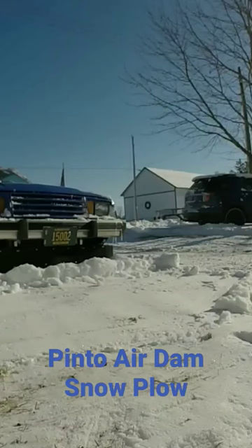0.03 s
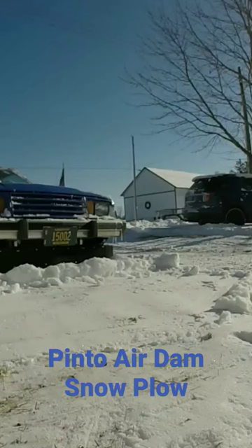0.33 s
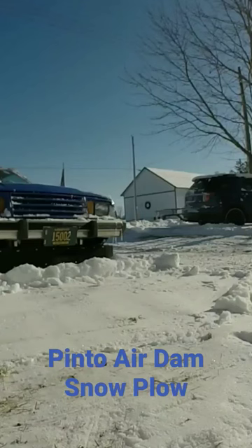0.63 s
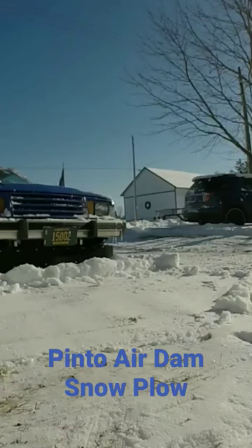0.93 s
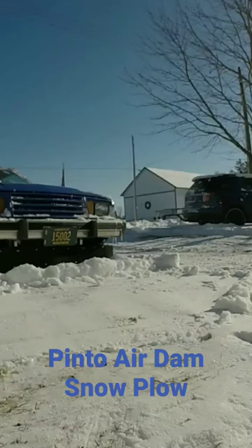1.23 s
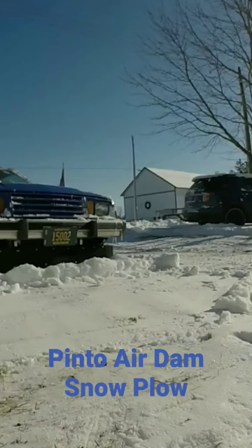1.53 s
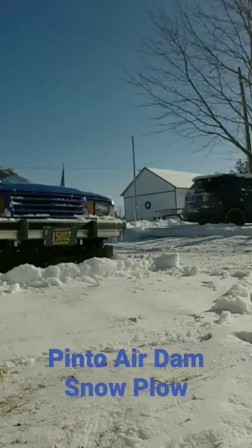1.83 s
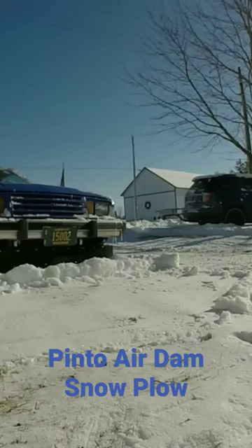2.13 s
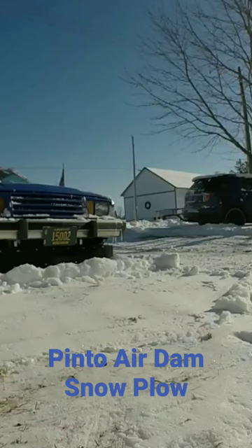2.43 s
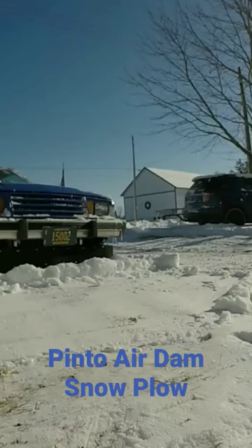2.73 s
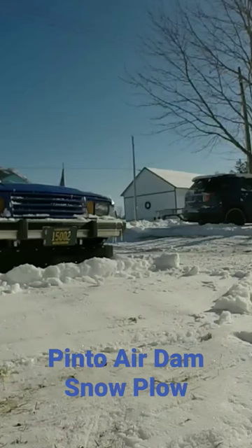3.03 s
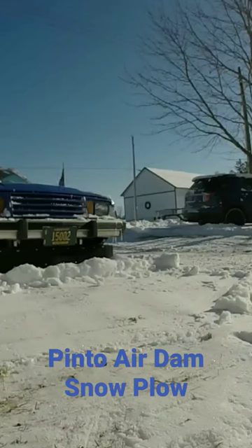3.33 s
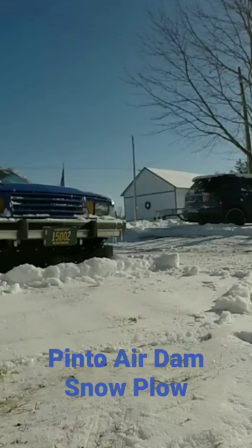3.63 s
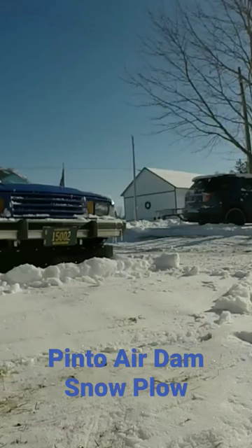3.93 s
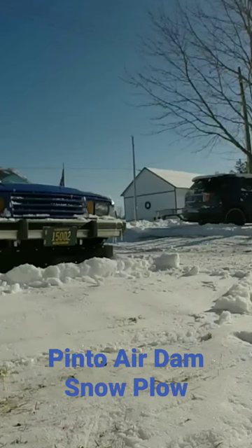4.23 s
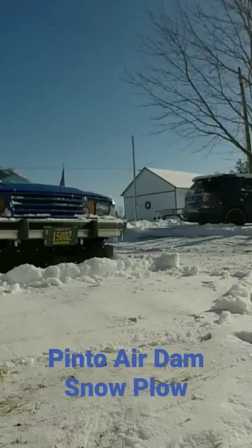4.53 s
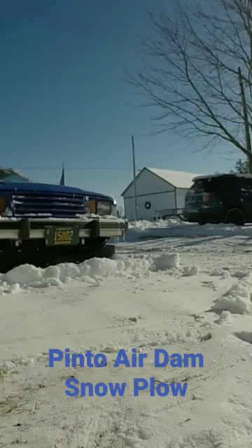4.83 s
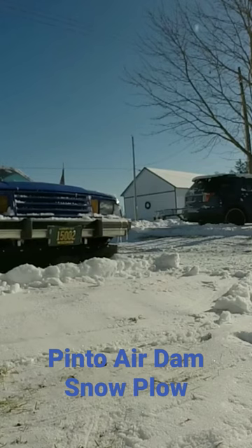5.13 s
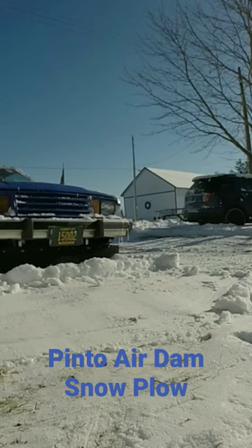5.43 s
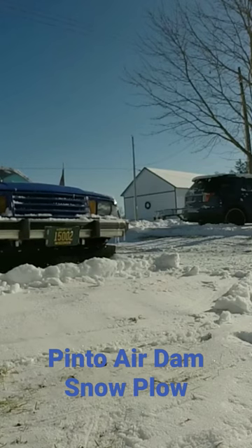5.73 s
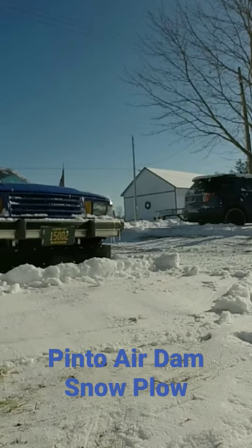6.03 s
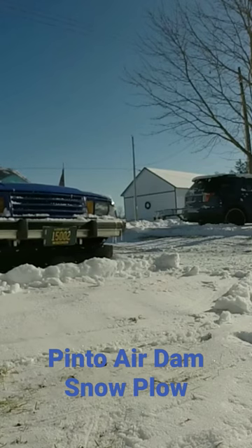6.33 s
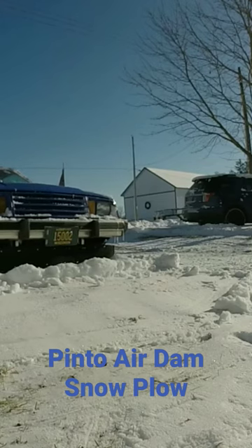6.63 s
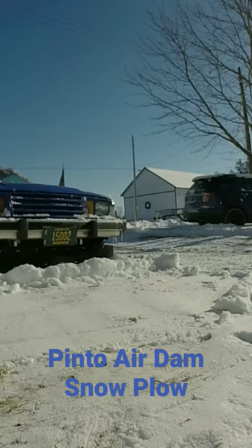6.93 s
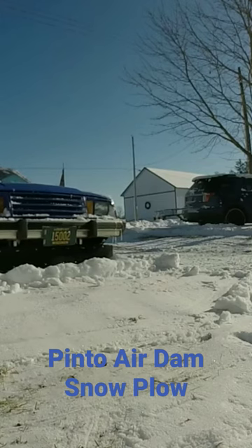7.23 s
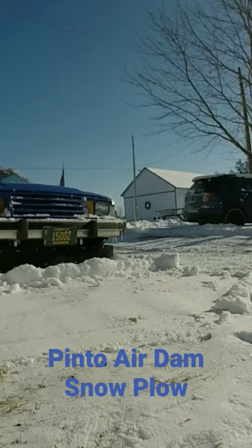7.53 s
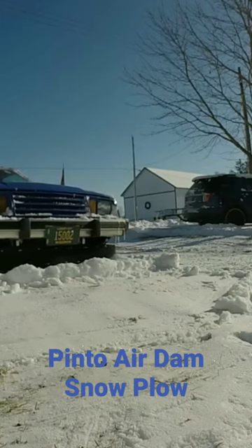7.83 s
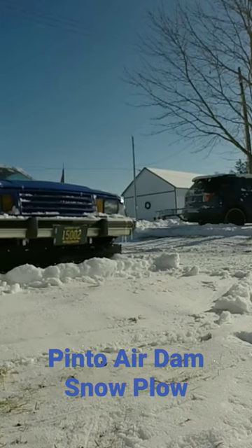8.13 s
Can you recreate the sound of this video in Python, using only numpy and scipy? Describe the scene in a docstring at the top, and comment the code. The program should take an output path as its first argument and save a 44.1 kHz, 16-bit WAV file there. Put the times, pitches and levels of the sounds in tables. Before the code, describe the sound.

After a split second of silence, the sound cuts in on a vehicle engine idling outdoors, heard almost entirely in the right channel. The exhaust gives a low drone with uneven thuds and rumble. Above it, more quietly, a fan rushes and hisses, valves tick lightly and an alternator adds a thin, fuzzy whine. The idle eases slightly in the first second, then holds steady. At about 4.2 seconds the engine is revved: the pitch climbs, the tailpipe booms, and the rush and whine grow louder, peaking between 4.6 and 5 seconds. It winds down and is back at idle by 6 seconds. At 7.5 seconds it revs again, quickly reaching a higher pitch, and stays there, loud, until the sound ends just after 8 seconds.

```python
"""After a brief silence the sound cuts in, almost wholly in the right channel: an engine idles in a snowy
yard. The exhaust drones on the firing rate and thuds unevenly, the fan rushes, the valves tick and a
belt-driven alternator whines in step with the shaft. Just after 4 s the engine is revved: its tones
rise, the tailpipe booms and the flow grows louder. It is back at idle by 6 s, and from 7.5 s it is
revved again, higher, until the sound ends."""
import sys
import numpy as np
from scipy.fft import rfft, irfft, next_fast_len
from scipy.io import wavfile
from scipy.ndimage import uniform_filter1d, map_coordinates

SR = 44100
rng = np.random.default_rng(int(sys.argv[2]) if len(sys.argv) > 2 else 0)


def bounce(signal):
    """Save signal as a 16-bit WAV file at the path given by the first command-line argument."""
    frames = np.transpose(np.atleast_2d(signal))
    limited = np.clip(frames, -1, 1)
    pcm = np.round(limited * 32767).astype(np.int16)
    wavfile.write(sys.argv[1], SR, pcm)


N = 360738

IDLE_HZ = 45  # firings per second at idle
BELT_LAPS = .215  # laps of the belt per firing


def amp(db):
    """Amplitude ratio for a level in decibels."""
    return 10 ** (np.asarray(db) / 20)


def unit(x):
    """The signal scaled to an rms of 1."""
    return x / np.sqrt(np.mean(x ** 2) + 1e-20)


def along(points, hz):
    """Rows of frequency and value, interpolated on a logarithmic frequency axis."""
    frequencies, values = np.transpose(points)
    return np.interp(np.log(hz + 1), np.log(frequencies + 1), values)


def curves(rows):
    """Linear interpolation in time: one value per sample for each column after the first."""
    seconds, *columns = np.transpose(rows)
    return [np.interp(np.arange(N) / SR, seconds, column) for column in columns]


def wobble(rate):
    """A smooth random fluctuation through `rate` Gaussian values a second."""
    knots = rng.standard_normal(int(N * rate / SR) + 4)
    return map_coordinates(knots, [np.arange(N) * rate / SR])


def filtered(x, response):
    """Linear filtering: the spectrum of x is multiplied by a frequency response."""
    size = next_fast_len(N + SR // 2)
    return irfft(rfft(x, size) * response(np.fft.rfftfreq(size, 1 / SR)), size)[:N]


def noise(spectrum):
    """White noise filtered to the given spectrum, with an rms of 1."""
    return unit(filtered(rng.standard_normal(N), lambda hz: amp(along(spectrum, hz))))


def bursts(cycles, life, scatter_db):
    """Exponential decay from a random height once a cycle; `life` is the time constant in cycles."""
    index = np.floor(cycles - np.floor(cycles[0])).astype(int)
    heights = amp(scatter_db * rng.uniform(-1.3, 1, SR // 10))
    return unit(heights[index] * np.exp(-(cycles % 1) / life))


def shaft():
    """Phase is the integral of frequency: the firing rate sums to a count that times every part."""
    # Each row: time in seconds, firing rate in Hz.
    firing_rate = [(0.13, 49.73), (0.94, 46.24), (2.72, 45.41), (4.22, 44.97), (4.45, 60.94), (4.68, 67.31),
                   (5.0, 65.78), (5.42, 57.2), (5.5, 51.26), (5.8, 46.53), (6.79, 44.86), (7.53, 45.56),
                   (7.85, 71.69), (7.93, 74.94), (8.18, 73.94)]
    full_pull = 0.57  # octaves per second at which the pull begins to saturate
    speed, = curves(firing_rate)
    firings = np.cumsum(speed) / SR
    revs = np.maximum(np.log2(speed / IDLE_HZ), 0)  # octaves above idle
    climb = uniform_filter1d(np.gradient(revs) * SR, size=SR // 6)
    pull = np.tanh(climb / full_pull)  # towards 1 speeding up, towards -1 coasting
    return speed, firings, revs, pull


def drone(speed, firings, revs, pull, hum_db):
    """Resonance: the firing note booms in the tailpipe; higher orders glide through the muffler's peaks."""
    # Tailpipe response. Each row: firing rate in Hz, level in dB.
    tailpipe = [(45, -23.5), (49, -21.5), (53, -20.5), (57.5, -15), (61, -14), (67, -13.5), (75, -16)]
    # Exhaust partials ahead of the muffler. Each row: multiple of the firing rate, relative level in dB.
    orders = [(2, 4), (3, 10), (3.5, -52), (4, 9), (4.25, -59), (4.5, -4), (4.75, -7), (5, -2), (6, -0.5),
              (6.25, -20), (6.5, 0), (6.75, -37), (7, 0), (7.5, -19), (7.75, 9), (8.25, 8), (8.5, -4),
              (9.5, 2.5), (10.75, -1.5), (13, -7.5)]
    # Muffler response. Each row: frequency in Hz, gain in dB.
    muffler = [(65, 12), (92, 2), (125, -11), (140, -15), (165, 2.5), (179, 2.5), (185, -2.5), (190, -1),
               (200, 2.5), (225, 0.5), (255, -36), (275, -0.5), (298, -6), (360, -54), (450, -17.5),
               (600, -31.5), (900, -60)]
    order_lag = .135  # cycles by which the second order trails the firing note at idle
    unsteady = (IDLE_HZ / speed) ** 2  # combustion evens out as the revs rise
    cycles = firings + .005 * unsteady * wobble(14)
    throttle_db = revs * pull  # the boom gains under throttle and loses while coasting
    boom_db = along(tailpipe, speed) + throttle_db + 0.68 * unsteady * wobble(26)
    hum = np.zeros(N)
    for order, db in orders:
        gain = amp(db + along(muffler, order * speed) + 0.67 * wobble(12))
        if order % 1:  # orders between the firings come from unequal cylinders
            gain = gain * unsteady ** .7
        lag = order_lag * ((order - 1) * unsteady) ** 2  # pulses smear at idle and sharpen with the revs
        if order > 6:  # the highest orders waver
            lag = lag + .13 * wobble(30)
        hum += gain * np.cos(2 * np.pi * (order * cycles - lag))
    return amp(boom_db) * np.cos(2 * np.pi * cycles) + amp(hum_db) * hum


def thuds(firings, revs, effort):
    """Pulsating flow: each firing puffs gas down the pipe, uneven combustion rumbles, fast flow roars."""
    # Spectra of puffs, rumble and pipe roar. Each row: frequency in Hz, relative spectral density in dB.
    puff_spectrum = [(20, -26), (40, -12), (62, -11.5), (90, -13.5), (140, -1.5), (210, 0), (300, -9),
                     (360, -6), (430, -15.5), (540, -23), (680, -55), (1500, -74)]
    rumble_spectrum = [(15, -16), (25, -23), (40, -11), (55, 8.5), (72, 1), (85, 1.5), (110, -4),
                       (200, -68)]
    roar_spectrum = [(200, -36), (280, -8), (325, 5.5), (380, -1), (450, -19), (610, 0), (700, -12.5),
                     (1000, -57)]
    puffs = 1 + 0.16 * np.cos(2 * np.pi * (firings - .25)) + 0.12 * np.cos(np.pi * (firings - .2))
    thud = amp(-37 + 0.39 * effort) * unit(noise(puff_spectrum) * puffs)
    rumble = amp(-36.5 + 0.49 * effort) * noise(rumble_spectrum)
    roar = amp(-37.5) * revs * noise(roar_spectrum)
    return thud + rumble + roar


def fan(firings, revs, pull, effort):
    """Flow noise: air rushes through fan and grille and hisses, amplitude-modulated by shaft and belt."""
    # Spectra of rush and hiss. Each row: frequency in Hz, relative spectral density in dB.
    rush_spectrum = [(150, -22), (400, -1), (600, -1.5), (660, -12.5), (710, -8.5), (790, 1.5), (990, -0.5),
                     (1150, 2), (1500, 1), (2050, -6), (2650, -5.5), (3000, -10), (5000, -23.5),
                     (10000, -62)]
    hiss_spectrum = [(1200, -36), (2600, -6), (3600, 5), (4500, 0), (5500, 1.5), (6100, -5), (7000, -8.5),
                     (8500, -10), (10000, -14), (13000, -17), (13800, -27), (15000, -44)]
    laps = BELT_LAPS * firings
    flutter = amp((-0.1 + 0.96 * revs) * np.cos(2 * np.pi * firings) + 0.64 * wobble(70))
    rush = amp(-44 + 1.27 * effort + 0.54 * wobble(120) + 0.34 * wobble(18)) * noise(rush_spectrum)
    intake_db = 0.9 * np.maximum(pull, 0)  # the intake hisses more while the throttle is open
    belt_db = 0.45 * np.cos(4 * np.pi * laps)  # two swells a lap
    hiss = amp(-52.4 + 1.01 * effort + intake_db + 0.18 * wobble(22) + belt_db) * noise(hiss_spectrum)
    return flutter * (rush + hiss)


def valves(firings, effort):
    """Damped impacts: valves close twice a firing, and one loose tappet ticks once in four firings."""
    # Spectrum of a tick. Each row: frequency in Hz, relative spectral density in dB.
    tick_spectrum = [(500, -23), (1200, 2), (2600, 10), (4500, -5.5), (8000, -5), (14000, -40)]
    patter = amp(-59 + 0.7 * effort) * bursts(2 * firings, life=0.28, scatter_db=6.5)
    tappet = amp(-61 + 0.68 * effort) * bursts((firings - 3.65) / 4, life=.08, scatter_db=3)
    return patter * noise(tick_spectrum) + tappet * noise(tick_spectrum)


def alternator(speed, firings, revs, pull, effort):
    """Forced vibration: the housing radiates a fuzzy whine, narrow noise bands that track the shaft."""
    # Whine partials. Each row: multiple of the firing rate, bandwidth in Hz, relative level in dB.
    partials = [(29.1, 50, 5), (58.2, 170, 5.5), (89.1, 480, 1.5), (118.1, 800, 0), (148.5, 850, -1.5),
                (175.4, 700, -4)]
    # Radiation from the housing. Each row: frequency in Hz, gain in dB.
    housing = [(1320, -4.5), (1500, -7), (1900, -19), (2600, -15), (4000, -18.5), (4700, -12),
               (5400, -12.5), (5900, -11), (6500, -14.5), (7000, -9), (8000, -15.5), (9000, -18),
               (10000, -39)]
    pull_db, octave_db = 3, 1  # gain at full pull, and per octave above idle
    load = amp(pull_db * pull + octave_db * revs)
    laps = BELT_LAPS * firings
    belt_db = 2.7 * np.cos(4 * np.pi * laps) + 2 * np.cos(2 * np.pi * laps)
    surge = unit(amp(2.6 * np.cos(2 * np.pi * firings) + belt_db + 1.3 * wobble(22)))
    cycles = firings + .002 * np.sin(2 * np.pi * firings)  # each firing jerks the belt, roughening the tone
    whine = np.zeros(N)
    for order, width, db in partials:
        fuzz = wobble(width) + 1j * wobble(width)
        tone = unit(np.real(fuzz * np.exp(2j * np.pi * order * cycles)))
        sway = surge * load if order > 70 else 1  # the top partials swell with firings, belt and load
        whine += amp(db + along(housing, order * speed)) * tone * sway
    return amp(-49 + 0.83 * effort) * whine


def bay(x):
    """Panel and cavity resonances under the hood colour the sound in narrow bands, lifting most."""
    # Each row: centre frequency in Hz, bandwidth in Hz, gain at the centre in dB.
    resonances = [(615, 58, 3.5), (1125, 53, 5), (1710, 210, -0.5), (1884, 25, 7.5), (2460, 87, 4.5),
                  (3380, 60, 1.5), (3680, 41, 5), (4500, 32, 8), (4820, 50, 7.5), (5600, 90, -3.5),
                  (6410, 46, 10), (6850, 76, 7), (8030, 98, -2.5), (9260, 100, 3)]

    def response(hz):
        return amp(sum(db / (1 + (2 * (hz - centre) / width) ** 2) for centre, width, db in resonances))

    return filtered(x, response)


def pulleys(firings):
    """Rotational tones: belt-driven parts hum between the engine's orders, straight into the open air."""
    # Hums of fan and pulleys. Each row: multiple of the firing rate, relative level in dB.
    hums = [(1.48, -39.5), (1.77, -41.5), (2.63, -41.5), (3.68, -41.5)]
    return sum(amp(db + 2.0 + wobble(7.2)) * np.cos(2 * np.pi * order * firings) for order, db in hums)


def scene():
    """Superposition: all sources follow one shaft, and the noises and whine grow with engine effort."""
    # How hard the engine works. Each row: time in seconds, effort in dB, gain of the muffler's hum in dB.
    workload = [(0.17, -39, -35), (0.86, -41, -36), (4.17, -41, -35.5), (4.57, -35, -34.5),
                (4.88, -35.5, -36), (4.95, -36.5, -35.5), (5.99, -41, -35.5), (7.48, -41, -36),
                (7.75, -34, -35), (8.15, -32, -32)]
    idle_effort_db = -41
    speed, firings, revs, pull = shaft()
    effort_db, hum_db = curves(workload)
    effort = effort_db - idle_effort_db  # dB above idle; each layer adds its own multiple to its level
    exhaust = drone(speed, firings, revs, pull, hum_db) + thuds(firings, revs, effort)
    rush = fan(firings, revs, pull, effort)
    ticks = valves(firings, effort)
    whine = alternator(speed, firings, revs, pull, effort)
    engine = exhaust + bay(rush + ticks + whine) + pulleys(firings)
    return np.array([engine, engine])


def record(dry):
    """Gating and channel imbalance: the sound cuts in at once; the left is faint, with a trace of hiss."""
    # Response of the left channel. Each row: frequency in Hz, gain in dB.
    left_response = [(45, -38), (65, -35.5), (100, -39.5), (400, -35), (1300, -36), (4000, -30.5),
                     (10000, -47)]
    start_s, opening_s, cutoff_hz = .128, .003, 15150
    gate = np.clip((np.arange(N) / SR - start_s) / opening_s, amp(-83), 1)
    left = filtered(dry[0], lambda hz: amp(along(left_response, hz)))
    hiss = amp(-71.5) * rng.standard_normal(N)
    pair = amp(6.5) * gate * np.array([left + hiss, dry[1]])
    return np.array([filtered(side, lambda hz: hz < cutoff_hz) for side in pair])


dry = scene()
out = record(dry)
bounce(out)
```